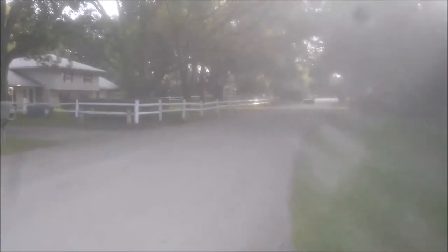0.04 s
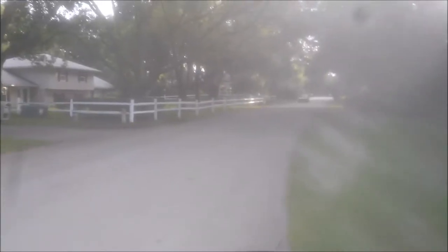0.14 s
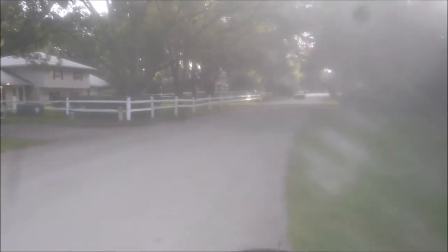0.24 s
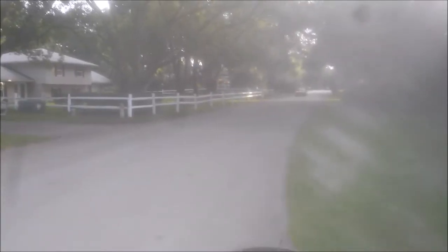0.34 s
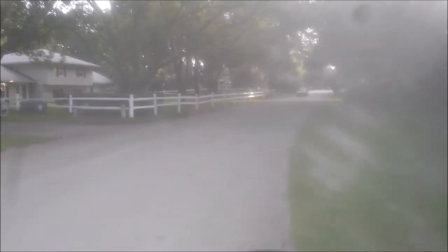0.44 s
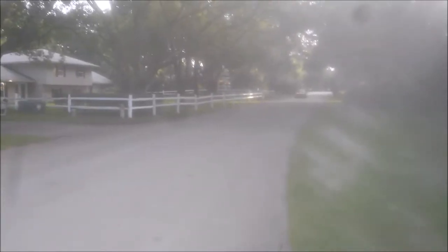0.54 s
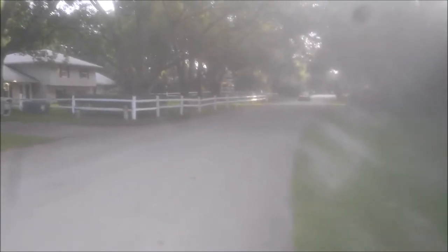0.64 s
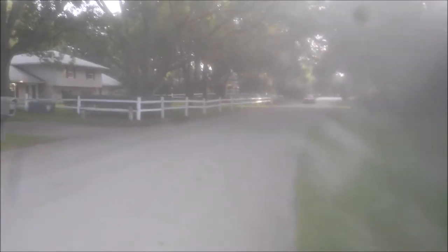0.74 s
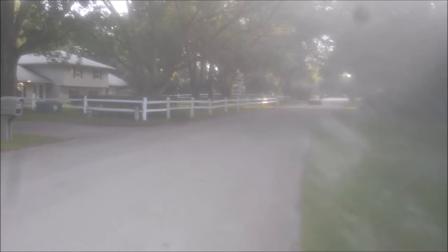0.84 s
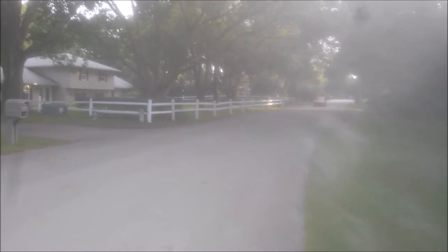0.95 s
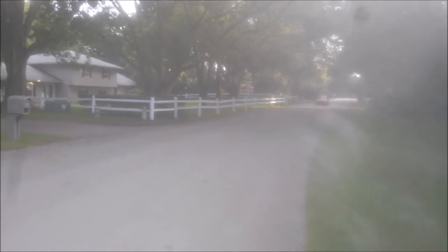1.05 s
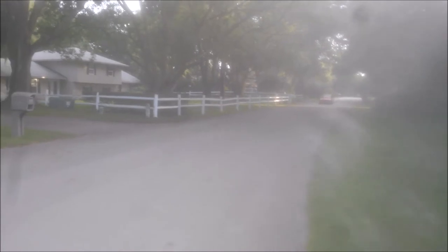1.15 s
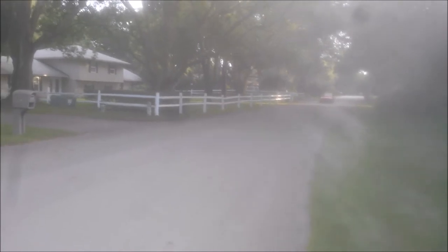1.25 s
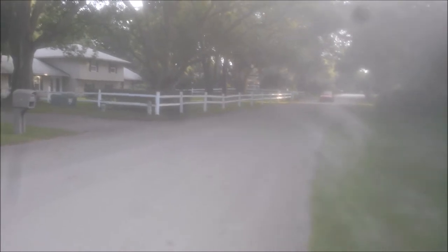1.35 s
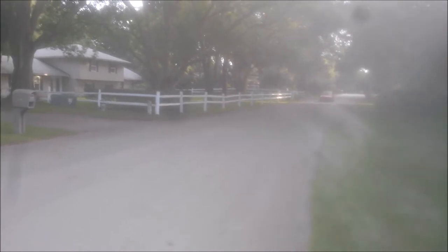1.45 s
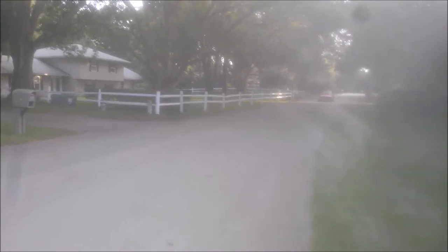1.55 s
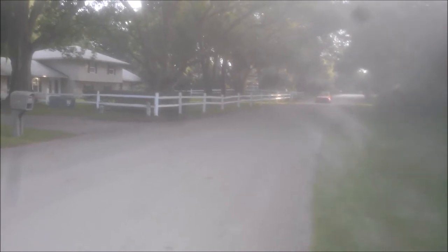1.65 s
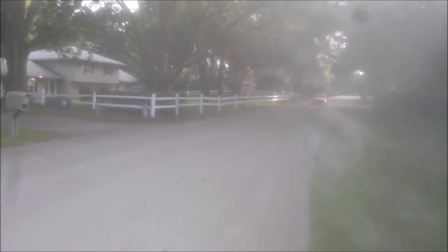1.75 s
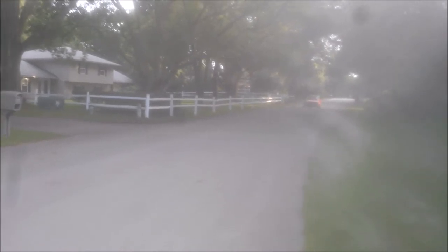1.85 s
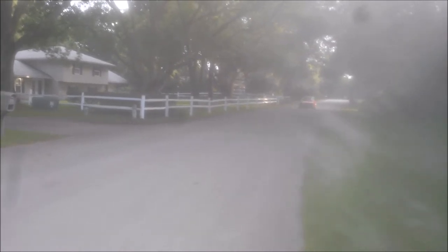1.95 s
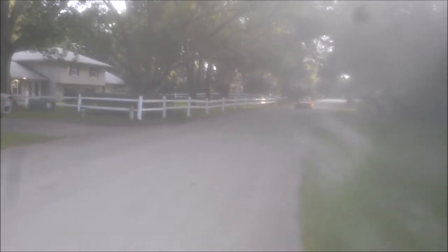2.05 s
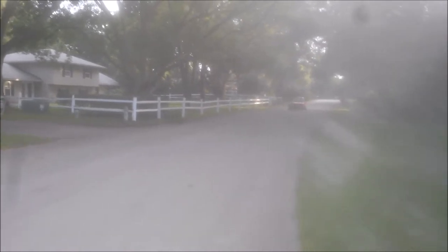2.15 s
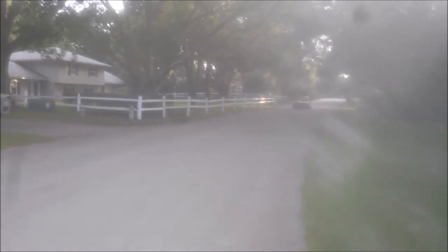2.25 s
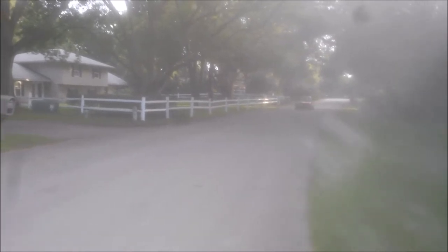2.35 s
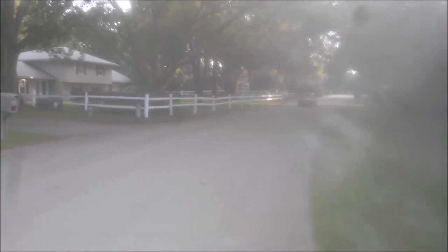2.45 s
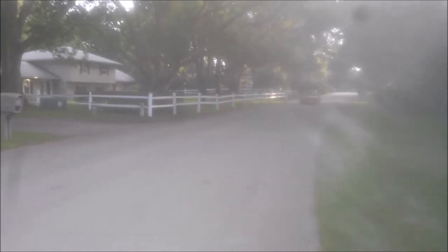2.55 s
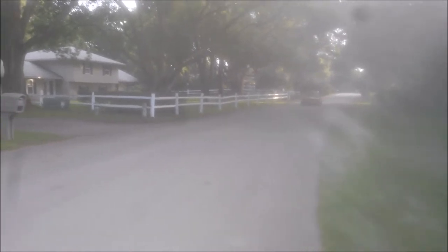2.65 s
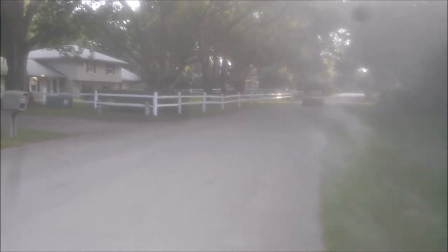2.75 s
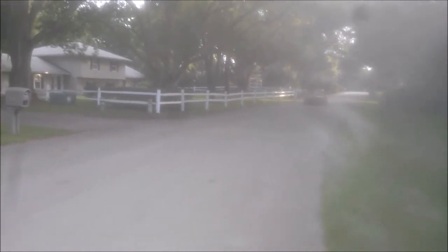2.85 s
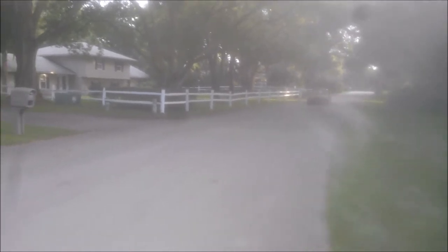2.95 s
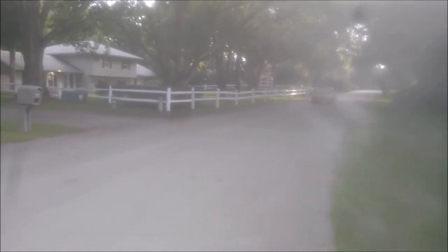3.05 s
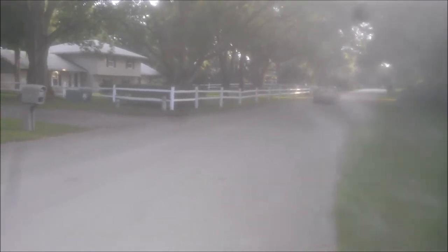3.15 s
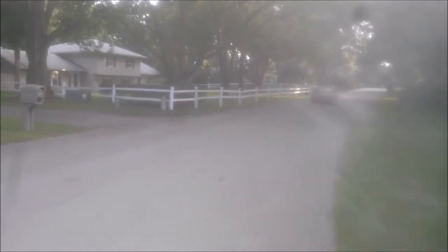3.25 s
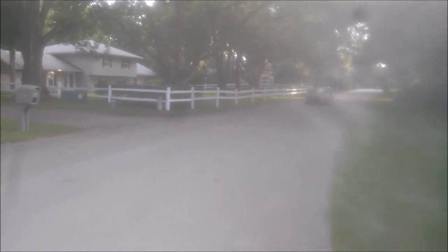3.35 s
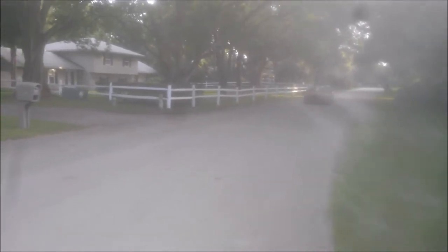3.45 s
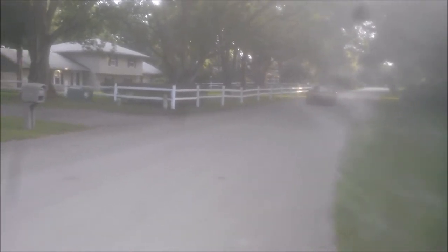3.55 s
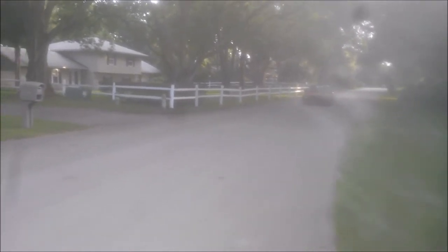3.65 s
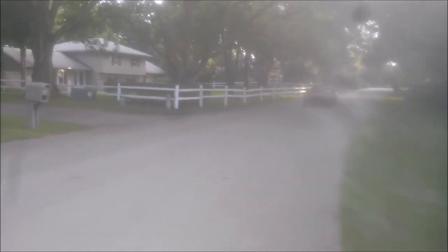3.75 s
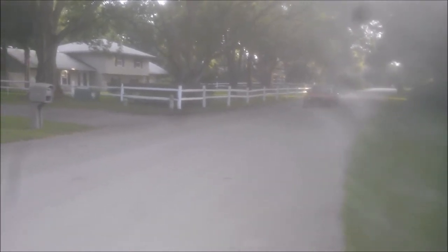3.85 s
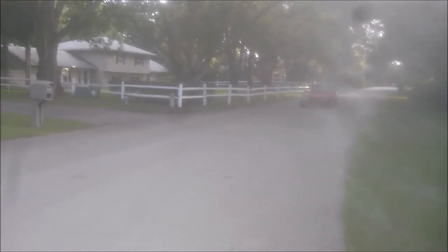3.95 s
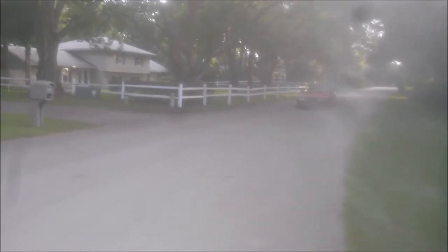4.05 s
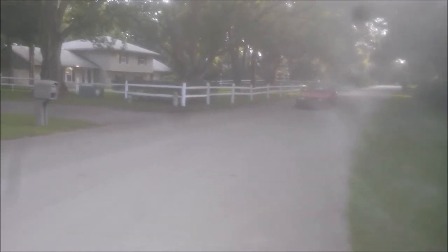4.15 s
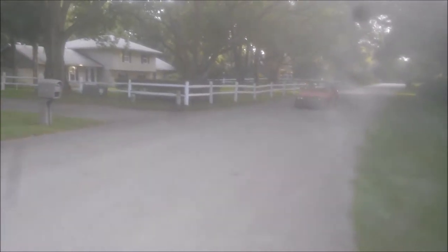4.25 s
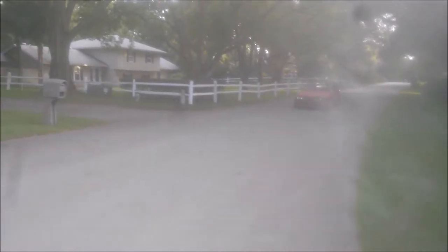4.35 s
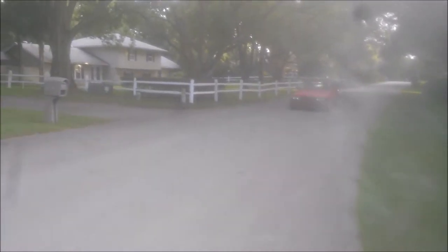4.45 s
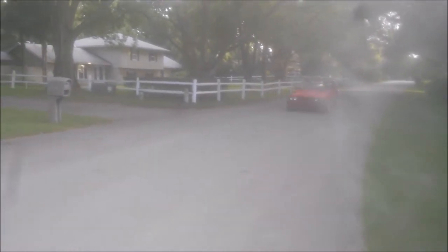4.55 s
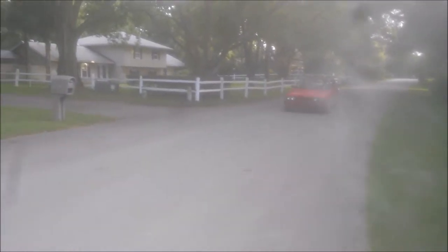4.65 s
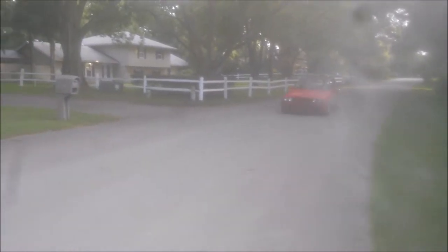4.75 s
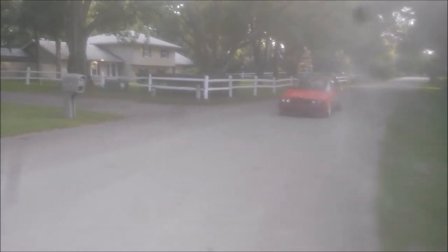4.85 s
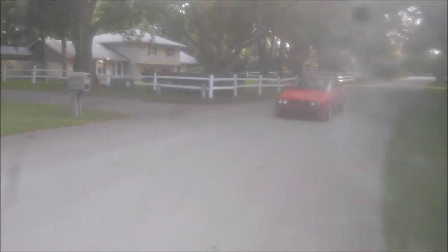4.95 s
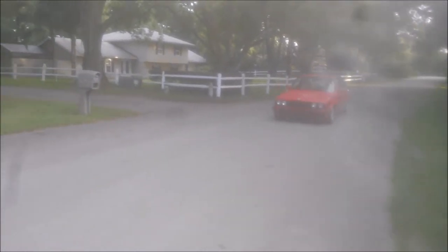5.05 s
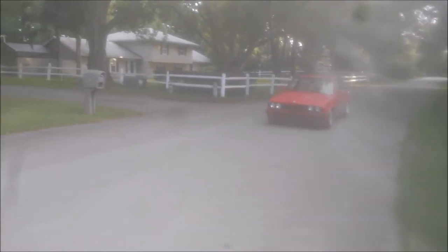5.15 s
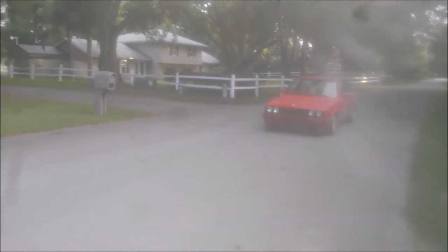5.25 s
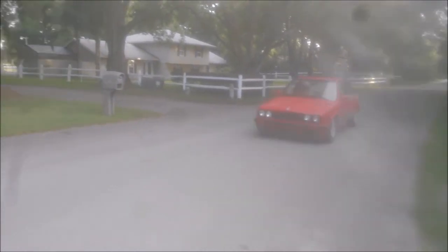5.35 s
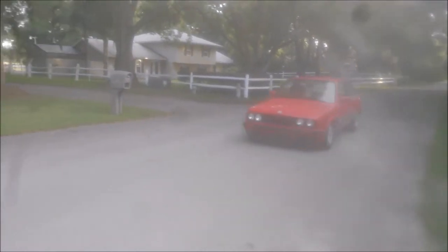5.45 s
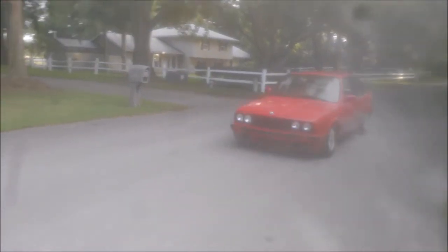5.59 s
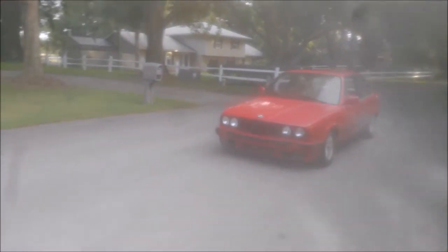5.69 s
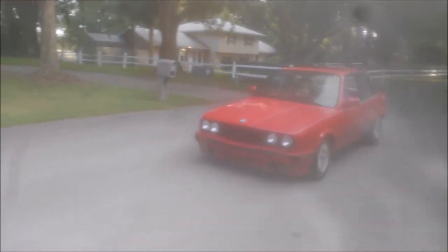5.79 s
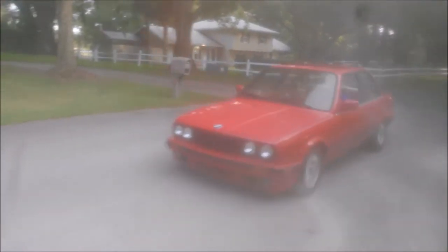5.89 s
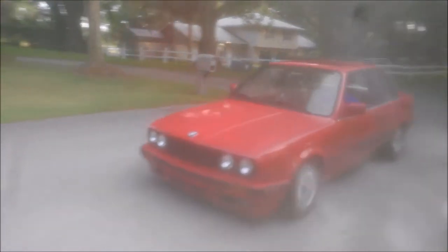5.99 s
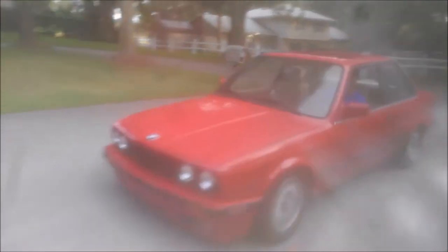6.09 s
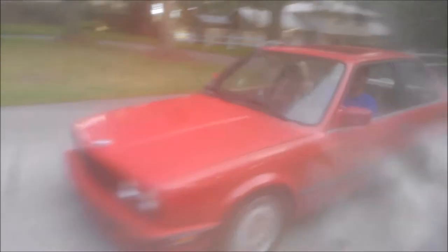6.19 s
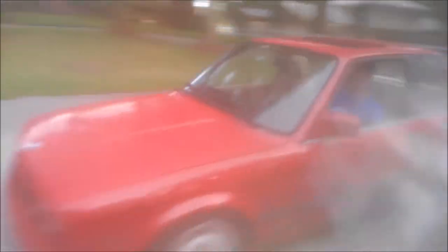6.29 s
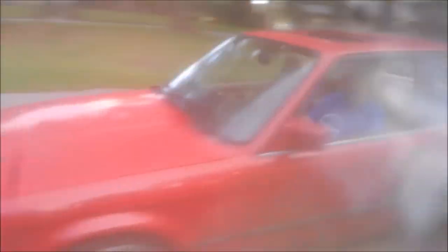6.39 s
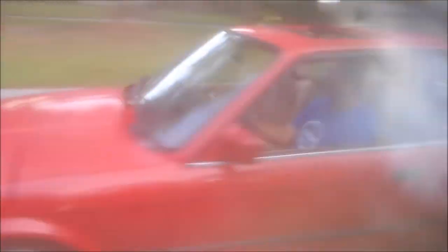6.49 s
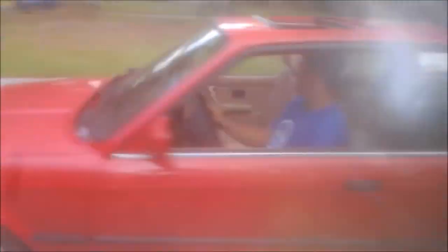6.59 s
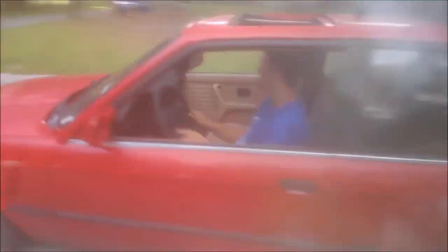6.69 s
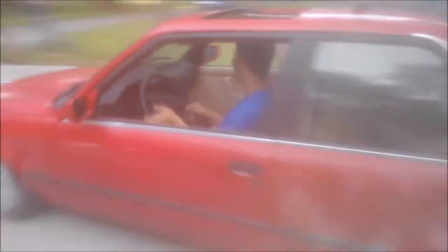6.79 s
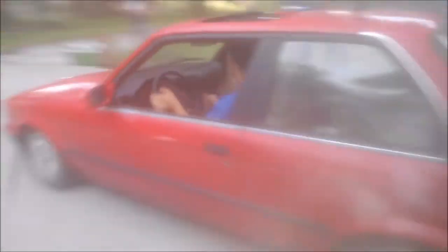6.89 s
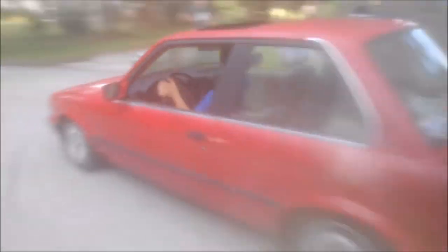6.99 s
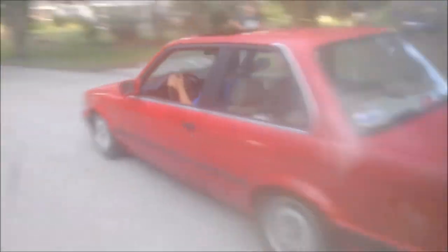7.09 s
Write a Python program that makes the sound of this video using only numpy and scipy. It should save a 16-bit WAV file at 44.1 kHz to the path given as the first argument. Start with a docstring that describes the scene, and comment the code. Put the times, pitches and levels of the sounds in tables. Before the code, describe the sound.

A smooth, fairly loud distant engine note holds for a second, then falls sharply in level and pitch. Crickets trill over faint, lumpy exhaust and airy road noise. The car approaches steadily, with irregular thumps, a dry tick near the microphone and metallic ticking. It passes close with a deep, slightly distorted boom, ending in a rough growl and crackling gas puffs.

```python
"""A six-cylinder car revs out a low gear far down a quiet street, then the throttle closes and it changes up.
Two crickets chirp as it rolls nearer: exhaust orders hum, tyres and engine bay hiss with an echo off the road.
Hard firings thump in the silencer, a dry tick sounds near the microphone and the valve gear pings.
The car slows as it passes, gas spits from the tail pipe and the small microphone overloads on the boom."""
import sys
import numpy as np
from scipy import signal
from scipy.fft import rfft, irfft, next_fast_len
from scipy.io import wavfile
from scipy.ndimage import uniform_filter1d, map_coordinates

SR = 44100
rng = np.random.default_rng(int(sys.argv[2]) if len(sys.argv) > 2 else 0)


def output_pcm(signal):
    """Save a mono or channel-first signal as 16-bit PCM at the path in sys.argv[1].

    Samples are clipped to [-1, 1] before scaling.
    """
    pcm = np.clip(np.atleast_2d(signal).T, -1, 1) * 32767
    wavfile.write(sys.argv[1], SR, np.round(pcm).astype(np.int16))


N = 314200

# swelling and fading of the exhaust note: time_s, level_db
EXHAUST_LEVEL = [(0, -27), (.12, -15.5), (.2, -21), (.29, -13), (.39, -21), (.5, -24), (.54, -15.5),
                 (.6, -13), (.7, -14.5), (.79, -10), (.88, -14), (1.03, -15), (1.16, -35), (1.47, -40.5),
                 (1.6, -47), (1.75, -33), (1.85, -37), (2.1, -29.5), (2.66, -36), (2.9, -30), (3.08, -31),
                 (3.3, -26), (3.5, -29), (3.61, -32.5), (3.98, -25.5), (4.15, -33.5), (4.3, -26.5),
                 (4.42, -23), (4.55, -23), (4.64, -25.5), (4.75, -20.5), (5.02, -20), (5.21, -15),
                 (5.57, -11), (5.66, -13), (5.74, -9.5), (5.805, -12.5), (5.83, -8.5), (5.95, -9),
                 (6.3, -6), (6.72, -9.5), (6.8, -10.8), (6.92, -12), (6.99, -21), (7.03, -15.5),
                 (7.12, -19)]
# how unevenly the cylinders fire, even under load, lumpy off it: time_s, level_db (against the exhaust note)
FIRING_UNEVENNESS = [(0, -22), (1.05, -15.5), (1.4, -0.5), (4.5, 0.5), (5.4, -4.5), (5.9, -10.5),
                     (6.3, -13.5), (6.8, -13), (7, -1), (7.12, -7.5)]
# loudness of the hard-revving engine far down the street: time_s, level_db
REVVING_LEVEL = [(0, -41.5), (.45, -39), (.7, -40), (.85, -45), (1, -53), (1.15, -63.5), (1.3, -100)]
# the tail of the car swings into earshot: time_s, level_db
TAIL_LEVEL = [(6, -59), (6.3, -29), (6.45, -12.5), (6.6, -9.5), (6.75, -5.5), (6.9, -2), (7, -1.5),
              (7.12, 1.5)]
# colour of the fine hiss: pitch_hz, relative_db (per Hz)
HISS_COLOUR = [(5000, -31), (7000, 0.5), (8500, -4.5), (10500, -10.5), (13000, -13), (15800, -21.5)]


def amp(db):
    """Turns decibels into gain: 20 dB is ten times the amplitude."""
    return 10 ** (np.asarray(db) / 20)


def unit(x):
    """Scales a sound to an rms (average strength) of 1."""
    return x / np.sqrt(np.mean(x ** 2) + 1e-20)


def along(points, hz):
    """Reads a curve of (Hz, value) points on a log pitch axis."""
    point_hz, values = np.transpose(points)
    return np.interp(np.log(hz + 1), np.log(point_hz + 1), values)


def curves(rows):
    """Joins timed rows by straight lines: one value per sample for each column after the time."""
    time_s, *columns = np.transpose(rows)
    return [np.interp(np.arange(N) / SR, time_s, column) for column in columns]


def wobble(rate):
    """Draws a smooth random curve through chance values, rate of them a second."""
    values = rng.standard_normal(int(N * rate / SR) + 4)
    return map_coordinates(values, [np.arange(N) * rate / SR])


def ring(x, modes):
    """Passes x through resonances (centre Hz, width Hz, dB), added with alternating sign."""
    m = next_fast_len(N + SR // 2)
    f = np.fft.rfftfreq(m, 1 / SR)
    gain = 0
    for k, (centre, width, db) in enumerate(modes):
        resonance = 1j * f * width / (centre * centre - f * f + 1j * f * width)
        gain = gain + (-1) ** k * amp(db) * resonance
    return irfft(rfft(x, m) * gain, m)[:N]


def rush(spectrum, patchy_db, turn=1.156):
    """Patchy coloured noise of rms 1, heard straight and once more off the road; turn is in radians."""
    # echo off the road: time_s, delay_ms, strength (0-1)
    road_echo = [(0, 1.6, .25), (1, 1.6, .25), (1.6, 2.15, .5), (2.8, 2.12, .7), (4.6, 2.1, .75),
                 (5.1, 2.05, .7), (5.5, 1.9, .5), (5.9, 1.6, .25), (7.12, 1.1, .1)]
    hz, t, z = signal.stft(rng.standard_normal(N), SR, nperseg=1024)
    patches = uniform_filter1d(uniform_filter1d(rng.standard_normal(z.shape), 8, 0), 4, 1)
    time_s, delay_ms, strength = np.transpose(road_echo)
    lag_s = np.interp(t, time_s, delay_ms) / 1000
    # the rough surface scatters the treble, so the echo fades above a few kHz
    share = np.clip(np.interp(t, time_s, strength), 0, .9) / (1 + (hz[:, None] / 3500) ** 6)
    # the glancing bounce turns the phase, which shifts the notches where echo and sound cancel
    echo = share * np.exp(1j * (turn - 2 * np.pi * hz[:, None] * lag_s))
    comb = np.abs(1 + echo) / np.sqrt(1 + share ** 2)
    colour_db = along(spectrum, hz)[:, None] + patchy_db * unit(patches)
    z = z * comb * amp(colour_db)
    return unit(signal.istft(z, SR, nperseg=1024)[1][:N])


def bursts(events, spectrum, rise, fall, trim_db):
    """Short swells of coloured noise at given times, with rise and fall time constants in seconds."""
    shape, t = np.zeros(N + SR), np.arange(SR // 10) / SR
    swell = (1 - np.exp(-t / rise)) * np.exp(-t / fall)
    for start_s, db in events:
        shape[round(start_s * SR):][:len(t)] += amp(db + trim_db) * swell
    return shape[:N] * rush(spectrum, patchy_db=3.0)


def firings():
    """Firing rate, and its running total: the count of firings so far."""
    # engine speed, revving out, changing up, slowing: time_s, firing_rate_hz
    engine_speed = [(0, 108), (.2, 112.1), (.4, 114.2), (.7, 115.5), (.8, 114), (1, 106.6), (1.18, 103.5),
                    (1.47, 96.36), (1.8, 69.8), (2.4, 68.99), (3.6, 66.42), (5.02, 63.21), (5.21, 62.1),
                    (5.74, 57.2), (5.86, 56.4), (6.19, 52.74), (6.6, 48.8), (6.93, 42.7), (7.12, 40)]
    hz, = curves(engine_speed)
    return hz, np.cumsum(hz) / SR


def firing_samples():
    """Finds the samples where the count of firings passes a whole number."""
    return np.flatnonzero(np.diff(np.floor(firings()[1])))


def at_firings(sizes):
    """Places one impulse of the given size at each firing."""
    out, at = np.zeros(N), firing_samples()
    out[at] = sizes[:len(at)]
    return out


def layer_levels():
    """Level in dB of each noise layer: powers of distant revving, nearing front, passing tail and street add up."""
    # how loud the nearing car reaches the listener: time_s, engine_bay_db, exhaust_roar_db, tyres_db
    nearness = [(0, -29.5, -6.5, -8), (1, -29, -5.5, -16), (1.15, -30, -17.5, -21),
                (1.3, -30.5, -17.5, -24), (1.6, -34, -14.5, -23), (1.8, -33, -22, -20.5),
                (2, -22, -18.5, -16), (2.5, -25, -15.5, -15), (2.75, -17.5, -17.5, -14),
                (3.3, -15.5, -14.5, -12.5), (3.6, -11, -9, -11.5), (3.9, -12, -8, -10.5),
                (4.6, -9.5, -4.5, -8), (4.95, -4.5, 0.5, -6), (5.6, -1.5, -2, -0.5), (6.05, -3, 1.5, -4.5),
                (6.33, -5, 0, -3.5), (6.45, -2.5, 2, -1.5), (6.8, 1, 2, -3), (7, -7.5, -13, -6),
                (7.12, -6, -11, -9)]
    # one row each for roar, tyres, engine bay, fine hiss, tail-pipe growl: over_revving_db,
    # front_closest_db, growth (dB per dB of nearness), tail_closest_db, quiet_street_db
    layer_table = [(-6, -35.5, 1.09, -55.5, -64), (-8, -41, 1.0853, -38, -73.5),
                   (-10.5, -38, 1.033, -29, -77.5), (-19.5, -48.5, 1.44, -43, -71),
                   (-15, -38, 1.4, -28.5, -53.5)]
    revs_db, tail_db = curves(REVVING_LEVEL)[0], curves(TAIL_LEVEL)[0]
    bay_db, roar_db, tyre_db = curves(nearness)
    near = [roar_db, tyre_db, bay_db, bay_db, roar_db]
    levels = []
    for (over_db, front_db, growth, closest_db, quiet_db), near_db in zip(layer_table, near):
        revving = amp(revs_db + over_db) ** 2
        front = amp(front_db + growth * near_db) ** 2
        tail = amp(tail_db + closest_db) ** 2
        levels.append(10 * np.log10(revving + front + tail + amp(quiet_db) ** 2))
    return levels


def exhaust():
    """Clean firing orders, plus wavering in-between orders: no two cylinders push alike."""
    # what the exhaust passes of firing orders 1, 2 and 3, one list each: pitch_hz, gain_db
    order_gains = [
        [(45, -35.5), (56, -28), (68, -7), (85, -1.5), (116, -0.5)],
        [(82, 0), (119, -1.5), (136, -6), (170, -10), (205, -15.5), (230, -26)],
        [(122, -11.5), (136, -19.5), (158, -26), (175, -23), (205, -12.5), (265, -13.5), (345, -25.5)],
    ]
    # in-between orders: multiple (of the four-stroke cycle), relative_db
    uneven_orders = [(5, -18), (7, -19), (8, -9), (9, -5), (10, -12.5), (11, -9.5), (13, -11), (14, -16),
                     (15, -2.5), (16, -14), (21, -5), (24, -8)]
    # what the exhaust pipe passes of them: pitch_hz, gain_db
    pipe_gain = [(20, -5.5), (60, -3.5), (100, 1), (125, -2.5), (170, -14.5), (250, -21), (400, -31)]
    fades_below_hz, steady_s = 243, 0.61  # only the boom swells quickly; higher orders follow the mean level
    linger_db, waver_db = 11, 4.5  # higher orders stay at most this far above a fading boom, and come and go
    lift_s, lift_db = 0.85, -20  # the throttle closes and the third order drops until the next gear

    hz, turns = firings()
    note_db, = curves(EXHAUST_LEVEL)
    mean_db = uniform_filter1d(note_db, size=int(steady_s * SR))
    steady_db = np.minimum(mean_db, note_db + linger_db)
    lifted_db, = curves([(lift_s - .03, 0), (lift_s + 0.026, lift_db), (1.5, lift_db), (1.62, 0)])
    hum = 0
    for k in range(1, 4):
        quick = 1 / (1 + (k * hz / fades_below_hz) ** 10)
        db = steady_db + quick * (note_db - steady_db) + along(order_gains[k - 1], k * hz)
        db = db + (k == 3) * lifted_db + (1 - quick) * waver_db * wobble(7)
        tone = np.sin(2 * np.pi * k * turns + 0.86 * (k - 1))
        hum = hum + np.sqrt(2) * amp(db + .5 * wobble(16)) * tone

    burble = 0
    for k, db in uneven_orders:
        phase = 2 * np.pi * (k / 6 * turns + rng.random()) + .6 * wobble(7)
        level_db = db + along(pipe_gain, k / 6 * hz) + 4 * wobble(6)
        burble = burble + amp(level_db) * np.sin(phase)
    return hum + amp(note_db + curves(FIRING_UNEVENNESS)[0]) * burble


def car_noise():
    """Noise from roar, tyres, bay and hiss; bay and hiss throb with the firings, the treble flickers together."""
    # colours of the revving engine, exhaust roar, tyres and engine bay: pitch_hz, relative_db (per Hz)
    revving_colour = [(600, -28.5), (760, -25), (1020, 6.5), (1250, -10.5), (1610, 1.5), (1950, -9),
                      (2150, -1), (2930, 0), (3200, -5.5), (3670, -9), (4450, 1.5), (5600, -6.5),
                      (6600, -10.5), (8000, -36.5)]
    roar_colour = [(30, -2), (60, 1.5), (260, -11.5), (350, -4), (430, -6.5), (560, -6.5), (660, -7),
                   (740, -11.5), (900, -20.5), (1500, -63.5)]
    tyre_colour = [(500, -22.5), (800, 5), (1100, 2), (1600, -1.5), (2200, -1.5), (2800, -3.5), (3300, -8),
                   (5000, -58.5)]
    bay_colour = [(2000, -22), (2900, -4.5), (3600, 4), (4500, 3), (5500, -0.5), (6500, -7), (7800, -30.5),
                  (10000, -60.5)]
    roar_db, tyre_db, bay_db, hiss_db = layer_levels()[:4]
    revs_db, = curves(REVVING_LEVEL)
    turns = firings()[1]
    throb = unit(1 + 0.071 * np.cos(2 * np.pi * turns) + 0.15 * np.cos(np.pi * turns))
    flicker_db = .7 * wobble(14) + wobble(45)
    revving = amp(revs_db + 1.2 * flicker_db) * rush(revving_colour, patchy_db=2.5)
    roar = amp(roar_db + wobble(15)) * rush(roar_colour, patchy_db=3.0)
    tyres = amp(tyre_db + 0.41 * flicker_db) * rush(tyre_colour, patchy_db=2.5)
    bay = amp(bay_db + flicker_db) * rush(bay_colour, patchy_db=2.5)
    hiss = amp(hiss_db + 1.56 * flicker_db) * rush(HISS_COLOUR, patchy_db=2.5)
    # while it revs, its own colour rules, so tyres and bay give way
    near = np.sqrt(1 - .9 * np.clip(amp(revs_db + 40.5), 0, 1))
    return roar + revving + near * (tyres + throb * bay) + throb * hiss


def lumps():
    """Chance in each firing's strength rings the silencer, turbulence the tail pipe; a few hard firings stand out."""
    # resonances of the silencer, then of the tail pipe: pitch_hz, width_hz, relative_db
    silencer_modes = [(105.3, 20.7, 0)]
    growl_modes = [(182.5, 45.4, -0.5), (269, 100, 0), (390.86, 96, -2.5), (488.6, 43, -6)]
    # single hard firings that ring the silencer: start_s, relative_db (before the rise and decay)
    hard_firings = [(1.476, -29.5), (1.649, -28.5), (2.395, -22.5), (2.713, -21), (2.998, -22),
                    (3.685, -17), (3.823, -18.5), (4.205, -21), (4.377, -16), (5.031, -14), (5.347, -22)]
    boom_grows, boom_trim_db = 1.38, -3  # chance firings follow the unevenness more steeply
    turbulence_db = 4  # the growl breaks into gusts close to the tail pipe

    boom_db = curves(EXHAUST_LEVEL)[0] + boom_trim_db + boom_grows * curves(FIRING_UNEVENNESS)[0]
    growl_db = layer_levels()[4] + turbulence_db * amp(curves(TAIL_LEVEL)[0]) * wobble(35)
    chance_firings = at_firings(rng.standard_normal(1000))
    boom = unit(ring(ring(chance_firings, silencer_modes), silencer_modes))
    growl = unit(ring(ring(rng.standard_normal(N), growl_modes), growl_modes))
    thumps, t = np.zeros(N + SR), np.arange(SR // 10) / SR
    for start_s, db in hard_firings:
        decay = amp(db - 60 * t / 0.25)  # falls 60 dB per 0.25 s
        thump = decay * (1 - np.exp(-t / 0.0019)) * np.sin(2 * np.pi * 104 * t)
        thumps[round(start_s * SR):][:len(t)] += thump
    return amp(boom_db) * boom + amp(growl_db) * growl + thumps[:N]


def valve_gear():
    """Ticks of scattered size at the firings rattle each panel by chance; the loudest ping on one note."""
    # resonances of the engine bay panels: pitch_hz, width_hz, relative_db
    panel_modes = [(2070, 160, 1), (2499.6, 71, -0.5), (2920, 90, 7), (3558, 280, 1.5), (3777, 84, -8.5),
                   (4376, 160, 0.5), (4750, 230, -3), (5640, 110, -5.5)]
    # metallic pings of the valve gear: start_s, relative_db (before trim, rise and decay), pitch_hz
    ping_list = [(4.0745, -33, 2447), (4.26, -31.5, 2526), (4.538, -36, 2470), (4.5942, -34.5, 2920),
                 (4.658, -26.5, 2603), (4.9085, -26.5, 2524), (5.0378, -27, 2887), (5.0908, -30, 2496),
                 (5.227, -33.5, 2538), (5.339, -32.5, 2686), (5.526, -36.5, 2794)]
    bay_db = layer_levels()[2]
    rattle = 0
    for hz, width, db in panel_modes:
        ticks = at_firings(np.clip(rng.standard_normal(1000) ** 3, -5, 5))
        rattle = rattle + ring(ring(ticks, [(hz, width, db)]), [(hz, width, 0)])
    pings, t = np.zeros(N + SR), np.arange(SR // 20) / SR
    for start_s, db, hz in ping_list:
        decay = amp(db + 2.5 - 60 * t / 0.0339)
        ping = decay * (1 - np.exp(-t / 0.0041)) * np.sin(2 * np.pi * hz * t)
        pings[round(start_s * SR):][:len(t)] += ping
    # the body hides the bay once the nose is past
    facing = np.interp(np.arange(N) / SR, [5.5, 6], [1, .1])
    return facing * amp(bay_db - 4.0) * unit(rattle) + pings[:N]


def hums():
    """Faint hums: noise rung through narrow resonances wavers around one pitch and fades in and out."""
    # the hums: pitch_hz, width_hz (of each of two resonances), start_s, end_s, start_db, end_db (before fades)
    hum_bands = [(366, 19.7, 1.17, 1.76, -54.5, -57), (338, 21.8, 2.03, 2.807, -48.5, -55),
                 (476, 18, 1.75, 3.28, -60, -62.5), (662.4, 21, 0.72, 5.6, -68.5, -50)]
    t, out = np.arange(N) / SR, 0
    for hz, width, start_s, end_s, start_db, end_db in hum_bands:
        mode = [(hz, width, 0)]
        band = unit(ring(ring(rng.standard_normal(N), mode), mode))
        level = amp(np.interp(t, [start_s, end_s], [start_db, end_db]))
        fade = np.interp(t, [start_s, start_s + 0.16, end_s - .2, end_s], [0, 1, 1, 0])
        out = out + band * level * fade
    return out


def chirps():
    """Each cricket chirps at its own pace, swelling and fading: rows of (s, relative dB, Hz)."""
    # timing of each cricket: first_s, last_s, period_s, period_growth_s (per chirp)
    cricket_pace = [(.875, 4.7, .2512, 0), (1.3, 4.7, .2128, .0016)]
    # song of each: wing_pitch_hz, loudest_db (relative), loudest_at_s, fade_before, fade_after (dB per s)
    cricket_song = [(7370, -53.5, 2.4, 7, 3.2), (7090, -61.5, 2.3, 5, 1.5)]
    scatter_db = 1
    rows, k = [], np.arange(20)
    for (first, last, period, grows), (hz, db, top, before, after) in zip(cricket_pace, cricket_song):
        start_s = first + period * k + grows * k * (k - 1) / 2
        level_db = db - np.maximum(before * (top - start_s), after * (start_s - top))
        level_db = level_db + scatter_db * rng.standard_normal(20)
        rows += [(s, level, hz) for s, level in zip(start_s, level_db) if s < last]
    return rows


def crickets():
    """Each wing stroke is a short tone that sags in pitch; four strokes, the first softer, make a chirp."""
    out, t = np.zeros(N + SR), np.arange(round(0.0208 * SR)) / SR
    stroke = np.sin(np.pi * t / t[-1]) ** .9
    for start_s, db, hz in chirps():
        luck = rng.standard_normal((4, 2))
        for k in range(4):
            pitch_hz = hz * (1 + 0.0044 * luck[k, 0])
            tone = np.sin(2 * np.pi * (pitch_hz * t - 2500 * (t - .008) ** 2))  # sags 5000 Hz per s
            swell_db = -4 * (k == 0) + 0.85 * luck[k, 1]
            at = round((start_s - .008 + k * .0213) * SR)
            out[at:][:len(t)] += 1.62 * amp(db + swell_db) * stroke * tone
    # hedges and house fronts smear the chirps into one another
    tail = rng.standard_normal(SR // 4) * amp(-60 * np.arange(SR // 4) / SR / 1.4)
    return out[:N] + .3 * signal.fftconvolve(out, tail / np.linalg.norm(tail))[:N]


def dry_tick():
    """A dry tick near the microphone: one very short burst of hiss."""
    # the tick: start_s, relative_db (before trim, rise and fall)
    tick_event = [(2.6758, -44.5)]
    return bursts(tick_event, HISS_COLOUR, rise=.008, fall=0.0049, trim_db=10.5)


def puffs():
    """Gas spits from the tail pipe: listed loud puffs, plus one at each of the last forty firings."""
    # loud puffs as the tail goes by: start_s, relative_db (before trim, rise and fall)
    loud_puffs = [(6.5636, -19), (6.622, -19), (6.6882, -17), (6.7494, -18), (6.7714, -19), (6.8148, -16),
                  (6.8387, -21.5), (6.8584, -20), (6.881, -16), (6.9064, -17), (6.9526, -13), (7.0288, -14)]
    # colour of gas leaving the tail pipe: pitch_hz, relative_db (per Hz)
    spit_colour = [(1500, -13.5), (2500, -1.5), (3600, -22), (5200, 5.5), (6500, -4.5), (8500, -13),
                   (11500, -16.5), (15800, -26)]
    puff_db, scatter_db = -21.5, 6.5  # before the same trim; each is up to scatter_db weaker by chance
    at = firing_samples()
    db = puff_db + curves(TAIL_LEVEL)[0][at] - scatter_db * rng.random(1000)[:len(at)]
    small_puffs = list(zip(at / SR, db))[-40:]
    return bursts(loud_puffs + small_puffs, spit_colour, rise=0.002, fall=0.007, trim_db=-5.0)


def scene():
    """Adds up the car, the faint hums, the crickets, the tick and the puffs."""
    car = exhaust() + car_noise() + lumps() + valve_gear()
    return (car + hums() + crickets() + dry_tick() + puffs())[None]


def record(dry):
    """The microphone flattens the tops of a sustained boom; nothing is kept above the band limit."""
    # headroom sags under a sustained boom: rms_level_db, ceiling (amplitude)
    headroom_sag = [(-10.8, .55), (-9.8, .355)]
    sag_s, top_hz = .07, 15830  # averaging time of the sag; band limit
    knee, rides_above_hz = 10.4, 870  # sharpness of the flattening; treble above this rides on the flat tops
    power = np.abs(uniform_filter1d(dry ** 2, size=int(sag_s * SR)))
    ceiling = np.interp(10 * np.log10(power + 1e-12), *np.transpose(headroom_sag))
    m = next_fast_len(N + 8192)
    hz = np.fft.rfftfreq(m, 1 / SR)
    boom = irfft(rfft(dry, m) / (1 + (hz / rides_above_hz) ** 4), m)[..., :N]
    flattened = boom / (1 + np.abs(boom / ceiling) ** knee) ** (1 / knee)
    x = dry - boom + flattened
    return irfft(rfft(x, m) * (hz < top_hz), m)[..., :N]


dry = scene()
out = record(dry)
output_pcm(out)
```